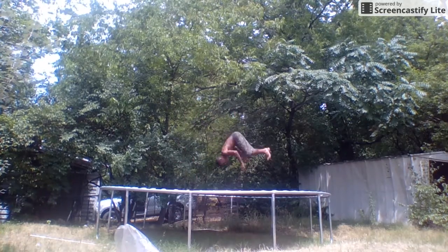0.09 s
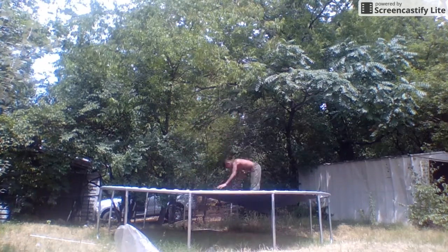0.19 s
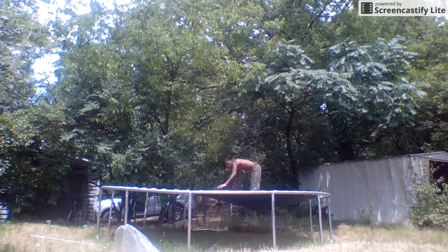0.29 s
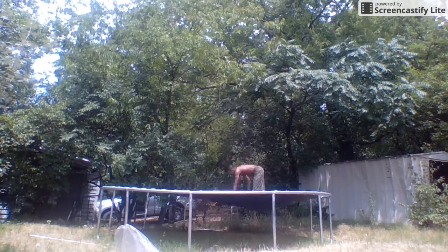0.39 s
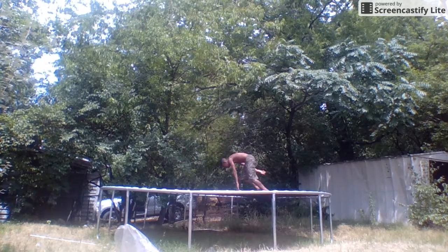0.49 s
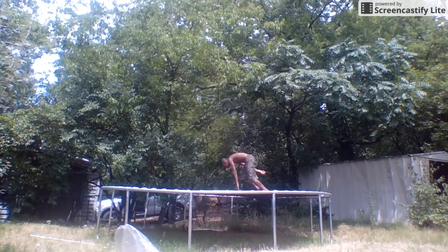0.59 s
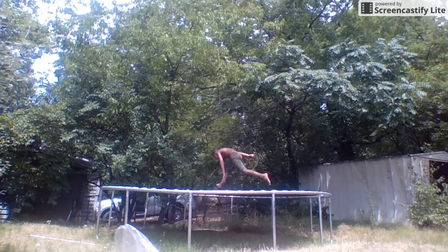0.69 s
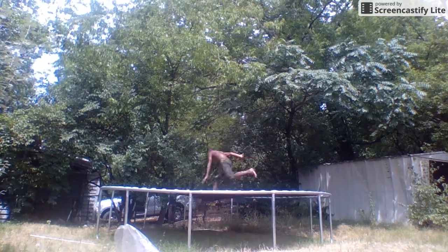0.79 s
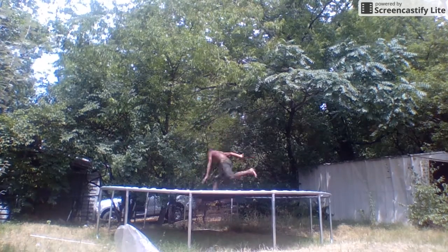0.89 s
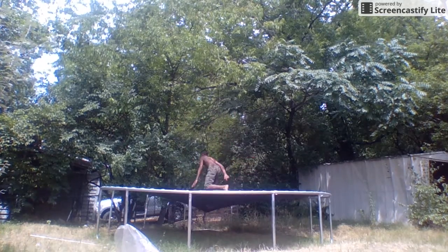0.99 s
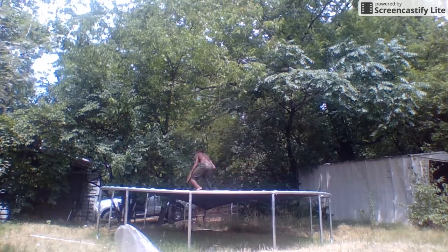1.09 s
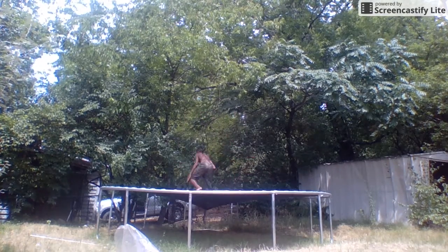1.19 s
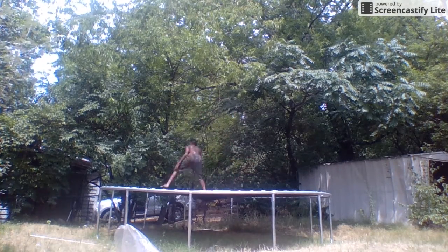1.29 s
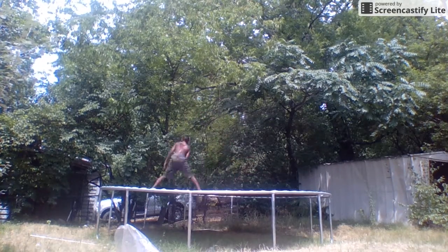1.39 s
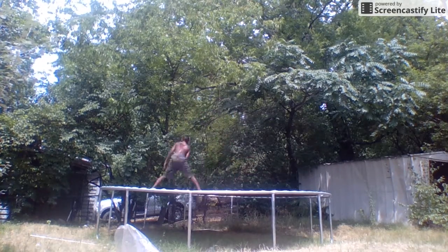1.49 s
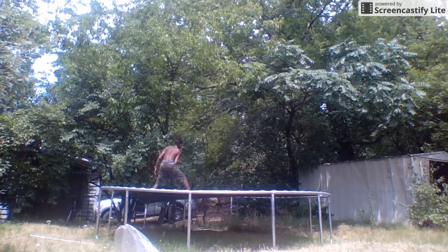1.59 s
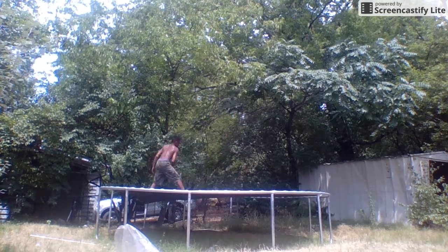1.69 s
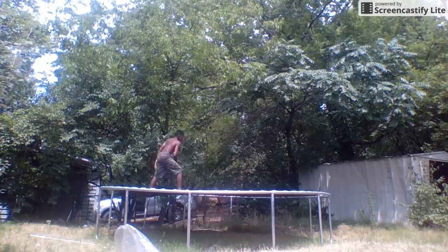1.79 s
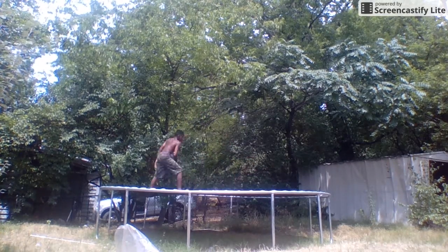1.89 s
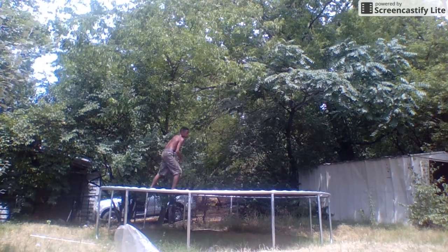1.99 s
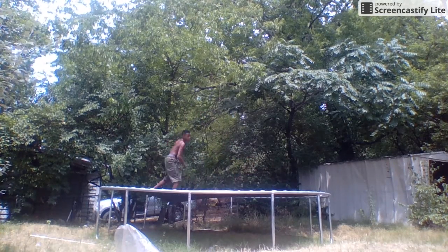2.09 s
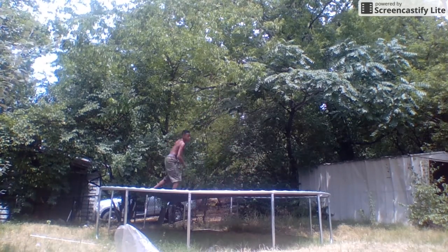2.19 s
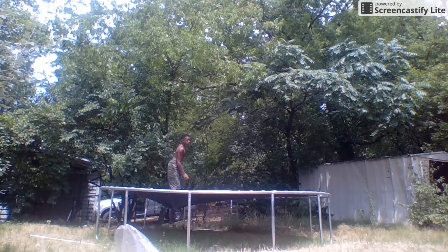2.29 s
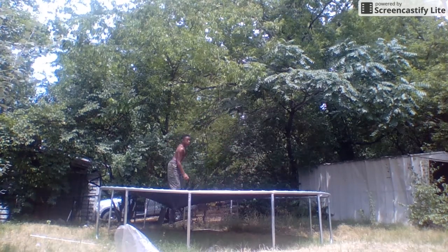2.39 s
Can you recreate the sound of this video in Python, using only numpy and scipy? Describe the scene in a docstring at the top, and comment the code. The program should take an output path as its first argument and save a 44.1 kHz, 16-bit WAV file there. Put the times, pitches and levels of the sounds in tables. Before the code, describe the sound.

A backyard trampoline rasps and squeaks under a hard landing, then two smaller creaking movements

```python
"""A person on a backyard trampoline some metres away lands and rolls, rises, then steps heavily and lightly.
Each move rubs the woven mat (dense grains: a bright swish) and makes stretched springs creak and ring in
their hooks (struck resonators, wavering tones, friction noise); the mat bottoms out in low, dying thuds.
Slack springs jingle on between landings, over a soft yard rumble, drone and hiss of shaped noise.
One microphone picks up everything."""
import sys
import numpy as np
from scipy import signal
from scipy.fft import rfft, irfft
from scipy.io import wavfile

SR = 44100
rng = np.random.default_rng(int(sys.argv[2]) if len(sys.argv) > 2 else 0)


def waveform_to_disk(signal):
    """Save audio, clipped to [-1, 1], as 16-bit WAV at the path in sys.argv[1]."""
    frames = np.transpose(np.atleast_2d(signal))
    scaled = np.clip(frames, -1, 1) * 32767
    samples = np.round(scaled).astype(np.int16)
    wavfile.write(sys.argv[1], SR, samples)


N = 105840   # samples: 2.4 s


def from_db(db):
    """Decibel law: amplitude gain of a level."""
    return 10 ** (np.asarray(db) / 20)


def rms_one(x):
    """Power normalisation: scale to rms 1."""
    return x / np.sqrt(np.mean(x ** 2) + 1e-20)


def in_time(rows):
    """Linear interpolation: the columns after time_s, at every sample."""
    time_s, *columns = np.transpose(rows)
    return [np.interp(np.arange(N) / SR, time_s, column) for column in columns]


def drift(rate_hz):
    """Low-passed noise: a slow random course of rms about 1, computed at every 40th sample."""
    step, settle = 40, 2000
    pole = np.exp(-2 * np.pi * rate_hz * step / SR)
    noise = rng.standard_normal(N // step + settle + 2)
    slow = rms_one(signal.lfilter([1], [1, -2 * pole, pole * pole], noise)[settle:])
    return np.interp(np.arange(N) / step, np.arange(len(slow)), slow)


def grains(per_s, spread_db):
    """Random impulse train: clicks at chance moments, of uneven size and either sign."""
    moment, size, sign = rng.random((int(per_s * N / SR) + 1, 3)).T
    size_db = spread_db * np.minimum(-np.log(size), 5)
    out = np.full(N, 1e-18)
    out[(moment * N).astype(int)] = from_db(size_db) * np.sign(sign - .5)
    return out


def ring(excitation, hz, t60):
    """Damped resonance: each impulse starts a sine that decays 60 dB in t60 seconds."""
    pole, w = from_db(-60 / (t60 * SR)), 2 * np.pi * hz / SR
    return signal.lfilter([0, np.sin(w)], [1, -2 * pole * np.cos(w), pole * pole], excitation)


def low_part(x, hz):
    """Zero-phase low-pass: the part of a sound below a pitch."""
    return signal.sosfiltfilt(signal.butter(2, hz, fs=SR, output="sos"), x)


def coloured(x, spectrum, patchy_db, patch_rate):
    """Spectral shaping: a flat sound takes on a spectrum; third-octave bands flicker on their own."""
    hz, points = np.fft.rfftfreq(N, 1 / SR) + 1, np.array(spectrum)
    # 20 dB down below the first point
    shape_db = np.interp(np.log(hz), np.log(points[:, 0]), points[:, 1], points[0, 1] - 20)
    shaped = rfft(x) * from_db(shape_db)
    place = 3 * np.log2(hz)   # third-octave steps
    first = max(int(3 * np.log2(points[0, 0])) - 1, 12)
    last = min(int(3 * np.log2(points[-1, 0])) + 2, 43)
    out = 0
    for k in range(first, last):
        band = irfft(shaped * np.clip(1 - abs(place - k), 0, 1), N)
        out = out + band * from_db(patchy_db * drift(patch_rate))
    return rms_one(out)


SWELL_HOLD = 0.76   # exponent; under 1 a swell holds near its top


def add(out, start_s, sound, rise):
    """Amplitude envelope: lay a sound down under one smooth swell that peaks at fraction rise."""
    i, u = max(int(start_s * SR), 0), np.linspace(0, 1, len(sound))
    warp = np.log(.5) / np.log(np.clip(rise, .1, .9))
    swell = abs(np.sin(np.pi * u ** warp)) ** SWELL_HOLD
    out[i:i + len(u)] += (sound * swell)[:N - i]


def springs(modes, per_s, t60, drive_db, count):
    """Modal synthesis: many springs share the modes, each a little detuned and struck at its own moments."""
    rings, plain_power = 0, 0
    for hz, width, db in modes:
        for off in rng.uniform(-0.78, 0.82, count):
            clicks = grains(per_s, spread_db=0.5) * from_db(db)
            rings = rings + ring(clicks * from_db(drive_db), hz + off * width, t60)
            # ringing power expected from the clicks without the drive
            plain_power = plain_power + np.sum(clicks ** 2) / N * t60 * SR / (4 * np.log(1000))
    return rings / np.sqrt(plain_power)


# low outdoor rumble, before a 3 dB lift: time_s [s], level_db [dB]
RUMBLE_LEVEL = [(0.0, -51.5), (0.23, -47), (0.26, -44.5), (0.49, -50.5), (1.88, -49), (1.9, -52),
                (2.27, -55), (2.35, -47.5), (2.4, -59)]
# spectrum of the rumble: pitch_hz [Hz], relative density_db [dB per Hz]
RUMBLE_SPECTRUM = [(15, -30), (25, 2), (65, -2.5), (134, 2), (430, -12.5), (493, -10), (743, -22),
                   (1120, -12), (1240, -19.5), (1500, -22.5), (1950, -48), (3300, -120)]
# spectrum of the hiss: pitch_hz [Hz], relative density_db [dB per Hz]
HISS_SPECTRUM = [(410, -35), (700, -2), (995, -5), (1080, -7.5), (2290, -17), (2750, -57), (11900, -12),
                 (15700, -20)]
HISS_DB = -51.5
DRONE_HZ, DRONE_T60_S, DRONE_DB = 140.4, 0.17, -63   # faint far drone


def yard():
    """Filtered noise: a low rumble, a drone from one noise-driven resonance, and a faint hiss."""
    rumble_gain = from_db(in_time(RUMBLE_LEVEL)[0] + 3.0)
    rumble = rumble_gain * coloured(rng.standard_normal(N), RUMBLE_SPECTRUM, patchy_db=1.0, patch_rate=36)
    drone = from_db(DRONE_DB) * rms_one(ring(rng.standard_normal(N), DRONE_HZ, DRONE_T60_S))
    hiss = coloured(rng.standard_normal(N), HISS_SPECTRUM, patchy_db=5.0, patch_rate=4.9)
    return rumble + drone + from_db(HISS_DB) * hiss


# drive of the slack springs: time_s [s], level_db [dB]
JINGLE_LEVEL = [(0, -36.5), (.15, -46), (.25, -40.5), (.6, -31.5), (.75, -61), (.82, -46), (1.1, -37.5),
                (1.25, -56), (1.4, -39), (1.55, -46), (1.75, -62), (1.9, -74), (2.2, -65), (2.3, -50),
                (2.4, -57)]
# modes of the slack springs: pitch_hz [Hz], detuning width_hz [Hz], relative level_db [dB]
SLACK_MODES = [(2660, 50, -6), (3687, 41, 3.5), (4162, 83, 9.5), (4865, 34, 11), (5350, 290, 7),
               (6050, 60, -8), (6870, 170, 11)]
SLACK_KNOCKS_PER_S, SLACK_T60_S = 64, 0.056   # knocks of each resonator


def jingle():
    """Impact excitation: slack springs, knocked at random, ring in their modes."""
    return springs(SLACK_MODES, SLACK_KNOCKS_PER_S, SLACK_T60_S, in_time(JINGLE_LEVEL)[0], count=3)


# mat bottoms out: start_s [s], pitch_hz [Hz], level_db before the soft onset [dB], t60_s [s]
THUDS = [(0.201, 69, -37, 0.15), (.32, 72, -23, 0.13), (1.628, 59.5, -35, 0.21), (1.692, 73, -34, 0.099),
         (1.79, 69.4, -40, 0.3), (1.836, 74, -38.5, 0.24), (2.33, 89, -36.5, 0.18)]


def thuds():
    """Damped oscillation: the mat's soft low pushes, each a decaying sine."""
    out, t = np.zeros(N), np.arange(N) / SR
    for start_s, hz, db, t60 in THUDS:
        age = np.maximum(t - start_s, 0)
        onset = 1 - np.exp(-age / 0.0039)
        out += from_db(db - 60 * age / t60) * onset * np.sin(2 * np.pi * hz * age)
    return out


# thin creaks sliding upward:
# start_s [s], length_s [s], from_hz [Hz], to_hz [Hz], level_db [dB], roughness_hz [Hz]
GLIDES = [(1.447, 0.1, 4860, 5050, -40, 15), (1.705, 0.068, 2150, 2440, -40, 38),
          (2.097, 0.17, 740, 1475, -49.5, 57)]


def glides():
    """Frequency modulation: a thin creak rises in pitch, roughened by random pitch drift."""
    out = np.zeros(N)
    for start_s, length, from_hz, to_hz, db, rough_hz in GLIDES:
        count = int(length * SR)
        pitch = np.linspace(from_hz, to_hz, count) + rough_hz * drift(63)[:count]
        add(out, start_s, from_db(db) * np.sin(2 * np.pi * np.cumsum(pitch) / SR), rise=0.81)
    return out


# hooks grind briefly: start_s (sounds 0.01 s earlier) [s], length_s (sounds 1.3 times as long) [s],
# pitch_hz of the band centre [Hz], level_db before the swell [dB]
GRINDS = [(.245, 0.04, 5020, -27.5), (0.24, .04, 3190, -27.5), (0.291, 0.064, 3530, -23.5),
          (0.294, 0.041, 5210, -25), (0.301, 0.082, 6850, -24.5), (0.32, 0.035, 3800, -29),
          (.455, 0.046, 2300, -33), (0.352, 0.047, 2480, -28.5), (0.448, 0.073, 6280, -26.5),
          (0.523, 0.065, 6220, -26.5), (0.532, 0.063, 5500, -30), (0.589, 0.057, 2280, -38.5),
          (0.957, 0.077, 6430, -30.5), (1.337, 0.12, 3420, -43), (0.818, 0.053, 3490, -43),
          (0.829, 0.058, 4950, -45), (1.611, 0.043, 1100, -40.5), (1.616, 0.067, 3320, -31),
          (1.615, 0.062, 3830, -29.5), (1.599, 0.093, 6450, -26.5), (1.654, 0.061, 1580, -36.5),
          (1.68, 0.084, 2230, -35.5), (1.769, 0.065, 2480, -43.5)]
GRIND_WIDTH_HZ = 202   # of one pass through the resonance


def grinds():
    """Resonant friction: rubbing noise passes twice through a hook resonance."""
    out, t60 = np.zeros(N), np.log(1000) / (np.pi * GRIND_WIDTH_HZ)
    for (start_s, length, hz, db), noise in zip(GRINDS, rng.standard_normal((len(GRINDS), SR // 3))):
        band = rms_one(ring(ring(noise, hz, t60), hz, t60))
        add(out, start_s - .01, from_db(db) * band[-int(1.3 * length * SR):], rise=0.42)
    return out


# single springs sing out: start_s (sounds 0.15 lengths earlier) [s],
# length_s (sounds 1.18 times as long) [s], pitch_hz [Hz], level_db before flutter and swell [dB]
SINGS = [(0.0, 0.11, 4080, -47), (0.02, 0.19, 4900, -44), (0.04, 0.072, 5100, -42), (0.0, 0.06, 7200, -53),
         (0.02, 0.2, 6920, -54), (0.035, 0.074, 3680, -49), (0.052, 0.18, 8010, -54),
         (0.058, 0.107, 3080, -54), (0.126, 0.15, 3590, -44), (0.263, 0.13, 6310, -23.5),
         (0.292, 0.11, 3515, -32), (0.295, 0.058, 2950, -27), (0.342, 0.068, 6730, -37),
         (0.389, 0.079, 1790, -48), (0.566, 0.128, 3015, -38), (0.627, 0.067, 2498, -38.5),
         (0.647, 0.097, 1770, -54), (0.65, 0.049, 4000, -40), (0.679, 0.17, 4920, -41),
         (0.676, 0.15, 4800, -42), (0.682, 0.091, 3661, -39), (0.696, 0.092, 2390, -44),
         (0.76, 0.055, 6000, -44), (0.823, 0.073, 4199, -41), (0.841, 0.052, 1646, -47),
         (0.847, 0.075, 1120, -46.5), (0.871, 0.134, 2486, -38.5), (0.92, 0.08, 2500, -41),
         (0.934, 0.08, 3400, -39), (0.944, 0.077, 1750, -48), (1.002, 0.15, 2250, -44.5),
         (1.039, 0.2, 6910, -43), (1.043, 0.053, 2566, -37), (1.062, 0.081, 5448, -52),
         (1.12, 0.14, 1784, -54), (1.147, 0.11, 3661, -46), (1.19, 0.066, 6250, -46),
         (1.235, 0.066, 4910, -46.4), (1.28, 0.14, 6930, -52), (1.289, 0.11, 2050, -53),
         (1.304, 0.062, 4027, -42), (1.36, 0.051, 4880, -40), (1.375, 0.065, 6250, -57),
         (1.498, 0.11, 3565, -47), (1.515, 0.11, 1780, -47), (1.54, 0.064, 2134, -48),
         (1.63, 0.094, 2960, -36), (1.635, 0.055, 4100, -34), (1.615, 0.06, 1800, -34),
         (1.655, 0.098, 2535, -34), (1.837, 0.069, 12700, -40.5), (2.015, 0.078, 6309, -52.5),
         (2.161, 0.075, 3273, -56), (2.224, 0.044, 6300, -53), (2.261, 0.052, 5260, -46),
         (2.295, 0.089, 5760, -43.5), (2.28, 0.083, 7000, -52), (2.31, 0.084, 7700, -47),
         (2.3, 0.04, 4870, -44), (2.29, 0.093, 6220, -44), (2.29, 0.07, 3610, -51), (2.3, 0.06, 3300, -50),
         (2.34, 0.028, 2300, -50), (2.34, 0.04, 1820, -45), (2.35, 0.03, 4450, -55),
         (2.339, 0.045, 5030, -46)]
SING_WAVER_HZ, SING_SPREAD_HZ = 14.3, 45.5   # depth of the waver; typical distance of the neighbours
SING_FLUTTER_DB, SING_FLUTTER_RATE_HZ = 2.5, 27   # each tone catches and slips unevenly


def sings():
    """Vibrato and beating: a spring and two weaker neighbours swell into a wavering tone and fade."""
    out, flutter = np.zeros(N), drift(SING_FLUTTER_RATE_HZ)
    for (start_s, length, hz, db), draws in zip(SINGS, rng.random((len(SINGS), 3, 3))):
        t = np.arange(int(1.18 * length * SR)) / SR
        for (phase, turn, off), side in zip(draws, (0, -1, 1)):
            waver = SING_WAVER_HZ * np.sin(2 * np.pi * (turn + 11.6 * t))
            pitch = hz + side * (.5 + off) * SING_SPREAD_HZ + waver
            flutter_db = SING_FLUTTER_DB * flutter[int(phase * (N - len(t))):][:len(t)]
            gain = from_db(db - 10.2 * abs(side) + flutter_db)
            tone = np.sin(2 * np.pi * (phase + np.cumsum(pitch) / SR))
            add(out, start_s - .15 * length, gain * tone, rise=0.52)
    return out


CROWD_KNOCKS_PER_S, CROWD_SPREAD_DB = 30, 2.5   # knocks of each mode and their unevenness
CROWD_T60_S, CROWD_SHORTENS_HZ = 0.13, 7560   # low-pitch ring time; pitch at which it halves


def crowd(low_hz, high_hz, count):
    """Modal density: many coil modes spread over a range, each knocked softly at its own moments."""
    pitches = np.linspace(low_hz, high_hz, count) + rng.uniform(-29.5, 32.4, count)
    t60s = CROWD_T60_S / (1 + (pitches / CROWD_SHORTENS_HZ) ** 2)
    out = 0
    for hz, t60 in zip(pitches, t60s):
        knocked = ring(grains(CROWD_KNOCKS_PER_S, CROWD_SPREAD_DB), hz, t60)
        out = out + rms_one(ring(knocked, hz, t60 / 2))   # the second resonance softens the onset
    return rms_one(out)


# motion of the mat in four parts: landing and roll, rise, heavy step, light step.
# time_s [s], rasp level_db before a 1 dB lift [dB],
# creak_db of stretched springs re rasp column, before CREAK_DB [dB], body_db re rasp column [dB]
MOTION = [
    [(0.0, -28.5, -2, -46), (0.034, -35, -11, -18), (0.102, -31.5, -15, -47), (0.19, -32.5, -11, -26),
     (0.226, -26.5, -9, -11), (0.264, -11.5, 1.5, -18.5), (0.287, -17.5, 4, -9), (0.31, -12.5, 4, -4.5),
     (0.34, -11, 2.5, -21.5), (0.362, -18, 0.5, -19.5), (0.383, -13.5, -3, -29), (0.408, -20, 1.5, -28),
     (0.474, -18, 3.5, -6.5), (0.568, -18.5, -1.5, -17), (0.8, -32.5, -5.5, -23)],
    [(0.812, -29, -22, -15), (0.822, -24.5, -5.5, -15.5), (0.915, -26.5, 0.5, -23), (0.937, -20, 0, -14.5),
     (0.978, -16.5, 0, -17), (1.028, -22.5, -0.5, -13), (1.11, -29, -8, -28), (1.19, -32, -15, -16),
     (1.234, -31, -19, -29), (1.24, -33.5, -12, -37), (1.34, -29.5, -9, -24), (1.414, -31, 3, -12.5),
     (1.5, -33, -11, -29)],
    [(1.52, -29, -10, -41), (1.556, -26.5, -1.5, -21), (1.612, -18.5, -5, -13.5), (1.632, -17, 2.5, -10.5),
     (1.696, -19, 1.5, -11.5), (1.744, -28, 1, -20), (1.762, -32.5, -3, -21), (1.804, -32, -23, -11),
     (1.818, -34.5, -13, -26), (1.842, -42.5, -10, -7), (1.87, -43.5, 0, -11)],
    [(1.9, -45, -3, -11), (1.92, -47, 2, -6), (1.936, -41.5, -2, -21), (2.0, -48.5, 7, -6.5),
     (2.032, -41.5, 0, -26), (2.078, -47.5, -4, -9), (2.202, -53.5, 4, -3), (2.216, -45, 3, -10),
     (2.272, -44, 5, -9), (2.286, -34.5, 2, -31), (2.296, -35.5, 4.5, -11), (2.376, -36, -0.5, -5),
     (2.4, -54, 15, 3)],
]
# spectrum of the rasp: pitch_hz [Hz], relative density_db [dB per Hz]
RASP_SPECTRUM = [(1400, -17.5), (2000, -34), (2200, -18.5), (2750, -15.5), (3560, -8.5), (4660, -10.5),
                 (6520, -6), (7600, -10), (9900, -7), (11700, -3.5), (11850, -1.5), (13500, -1),
                 (14500, -4), (15400, -6)]
# spectrum of the body of the rasp: pitch_hz [Hz], relative density_db [dB per Hz]
BODY_SPECTRUM = [(500, -32.5), (900, -8.5), (1250, -6), (1600, 0), (2300, 2), (3500, -1.5), (6000, 2.5)]
# modes of the stretched springs: pitch_hz [Hz], detuning width_hz [Hz], relative level_db [dB]
TAUT_MODES = [(1756, 70, -5.5), (2153, 70, 0.5), (2596, 170, 1), (2960, 63, 3), (3280, 35, 2),
              (3553, 40, -4.5), (4150, 150, 1), (4990, 30, -1), (5570, 130, 7), (6416, 98, 0),
              (8660, 120, 8.5), (12020, 140, 5), (12150, 29, 4), (12390, 82, -4), (14740, 27, -4)]
RASP_GRAINS_PER_S, RASP_SPREAD_DB = 9000, 1.5
RUB_DB, CROWD_DB = -0.5, -5   # dry rubbing of the weave and shaken springs, mixed before shaping
RUB_MIDS_HZ, RUB_MIDS_DB = 7650, -5   # below this pitch the rubbing is fainter and the springs stand out
MIDS_HZ, MIDS_FOLLOW, MIDS_EVEN_DB = 4730, 0.42, -4.5   # below this pitch the rasp fills out with creak
BODY_RING_DB = -8   # low coil modes re the noise in the body of the rasp
TAUT_SLIPS_PER_S, TAUT_T60_S, CREAK_DB = 270, 0.06, -11   # slips of each resonator


def mat():
    """Stick-slip friction: the weave rubs in dense grains, shakes the springs and makes their hooks slip."""
    rasp_db, creak_db, body_db = in_time(np.concatenate(MOTION))

    weave = from_db(RUB_DB) * rms_one(grains(RASP_GRAINS_PER_S, RASP_SPREAD_DB))
    weave = weave + (from_db(RUB_MIDS_DB) - 1) * low_part(weave, RUB_MIDS_HZ)
    rub = weave + from_db(CROWD_DB) * crowd(low_hz=1698.4, high_hz=15667, count=200)
    rasp = from_db(rasp_db + 1.0) * coloured(rub, RASP_SPECTRUM, patchy_db=0.5, patch_rate=6.4)
    mids_gain = from_db(MIDS_FOLLOW * (creak_db - MIDS_EVEN_DB))
    rasp = rasp + (mids_gain - 1) * low_part(rasp, MIDS_HZ)

    low_coils = from_db(BODY_RING_DB) * crowd(low_hz=850.0, high_hz=2793, count=24)
    skin = rng.standard_normal(N) + low_coils
    body = from_db(rasp_db + body_db) * coloured(skin, BODY_SPECTRUM, patchy_db=5.5, patch_rate=18.5)

    drive_db = rasp_db + creak_db + CREAK_DB
    return rasp + body + springs(TAUT_MODES, TAUT_SLIPS_PER_S, TAUT_T60_S, drive_db, count=4)


def scene():
    """Superposition: all sources add at one microphone, heard alike in both channels."""
    mix = yard() + jingle() + thuds() + glides() + grinds() + sings() + mat()
    return np.tile(mix, (2, 1))


MIC_PEAK_HZ, MIC_PEAK_WIDTH_HZ, MIC_PEAK_DB = 11980, 410, 1.5
CUTOFF_HZ = 15750


def record(dry):
    """Transducer response: a small microphone lifts a band near 12 kHz; peaks clip; the top is cut steeply."""
    b, a = signal.iirpeak(MIC_PEAK_HZ, MIC_PEAK_HZ / MIC_PEAK_WIDTH_HZ, fs=SR)
    lifted = dry + (from_db(MIC_PEAK_DB) - 1) * signal.lfilter(b, a, dry)
    clipped = np.clip(lifted, -.92, .92)
    steep_cut = signal.ellip(16, .5, 88, CUTOFF_HZ, fs=SR, output="sos")
    return signal.sosfilt(steep_cut, clipped)


dry = scene()
out = record(dry)
waveform_to_disk(out)
```